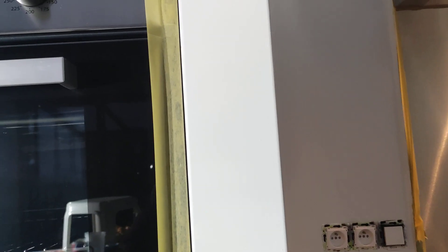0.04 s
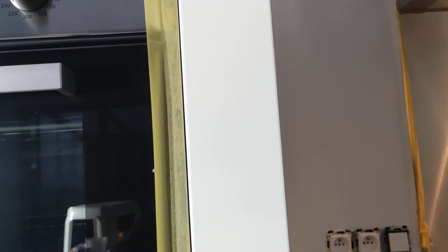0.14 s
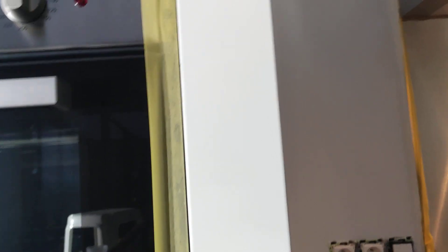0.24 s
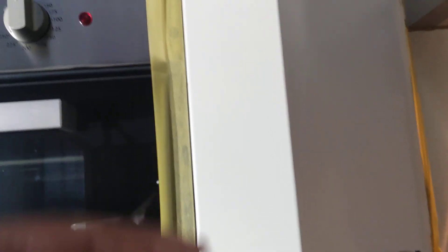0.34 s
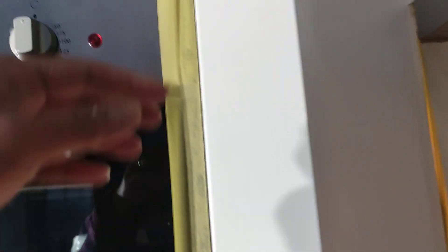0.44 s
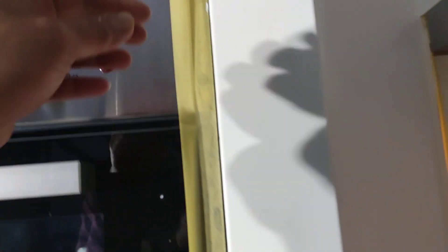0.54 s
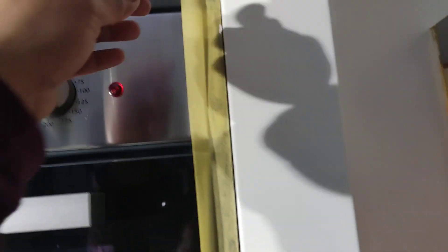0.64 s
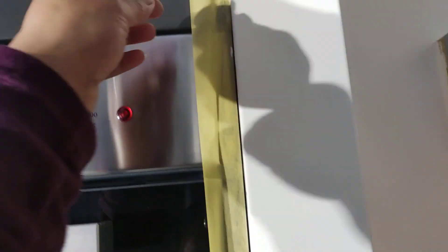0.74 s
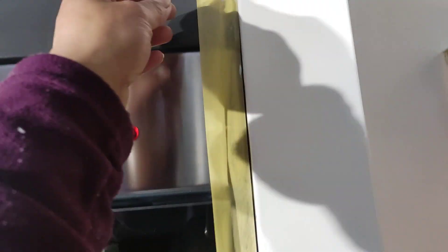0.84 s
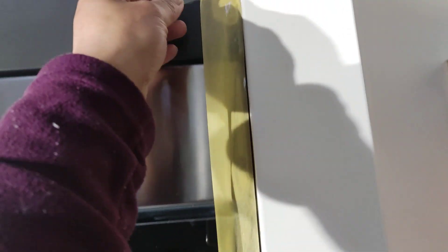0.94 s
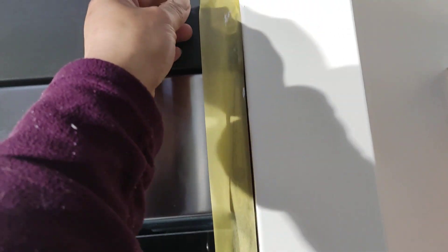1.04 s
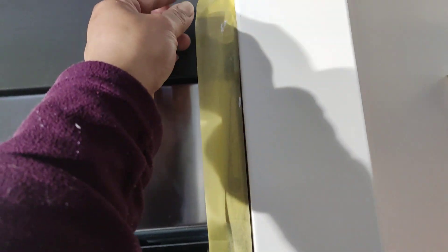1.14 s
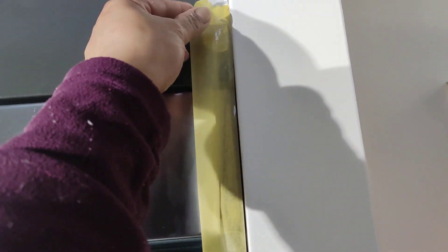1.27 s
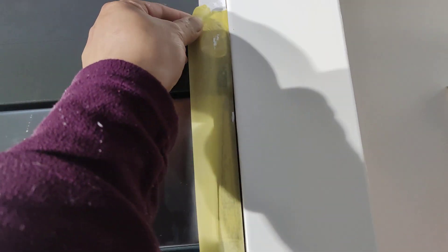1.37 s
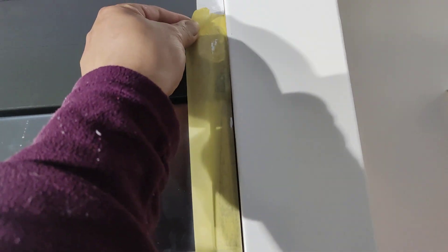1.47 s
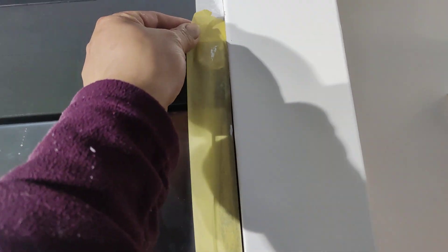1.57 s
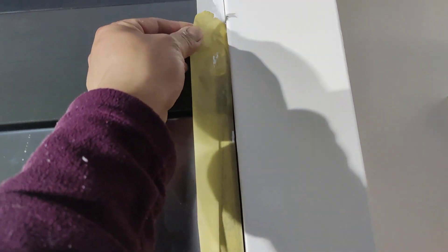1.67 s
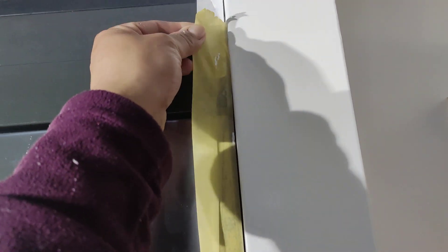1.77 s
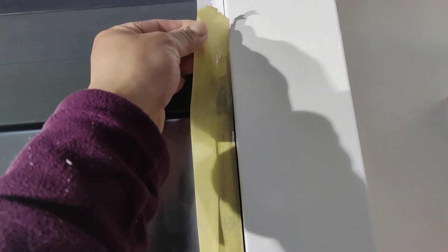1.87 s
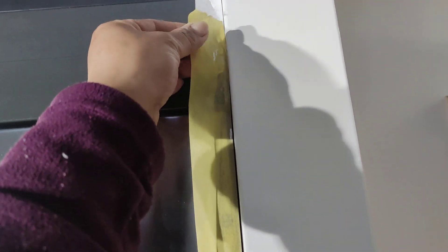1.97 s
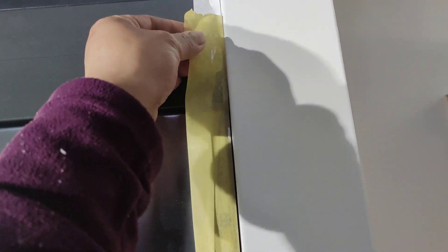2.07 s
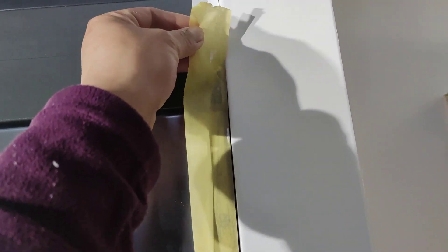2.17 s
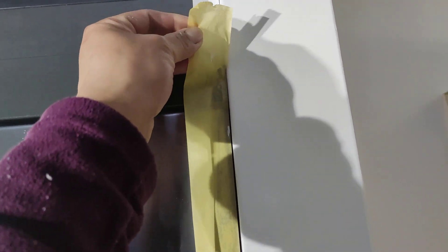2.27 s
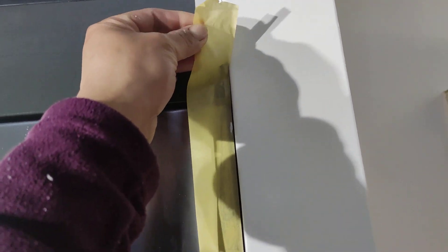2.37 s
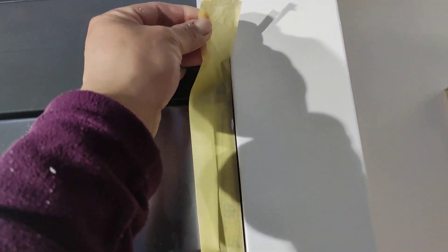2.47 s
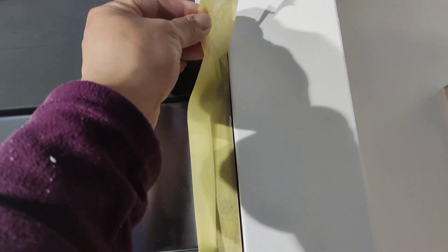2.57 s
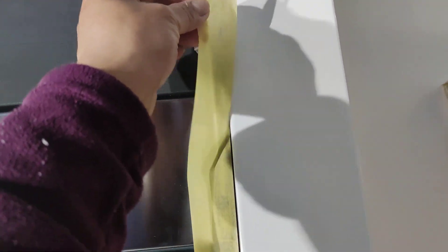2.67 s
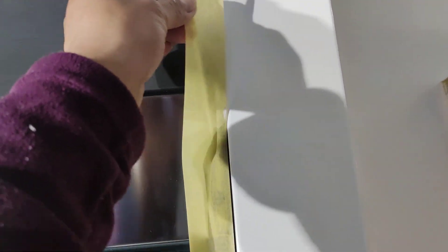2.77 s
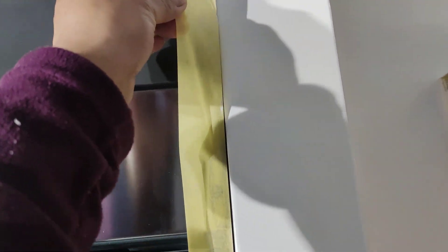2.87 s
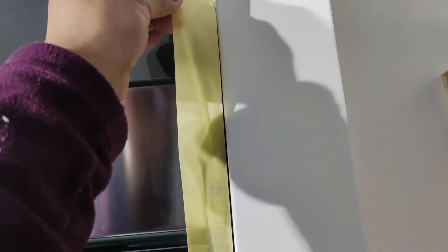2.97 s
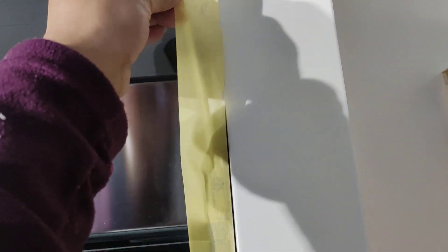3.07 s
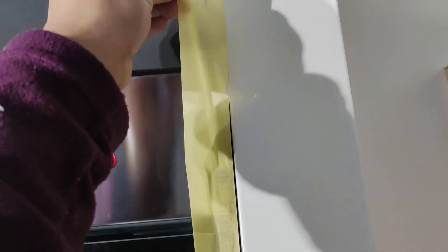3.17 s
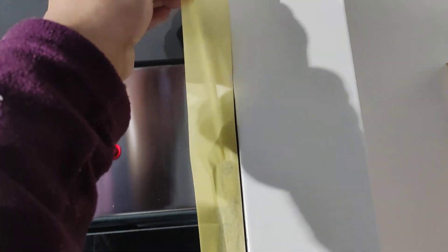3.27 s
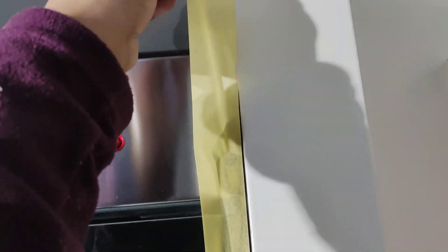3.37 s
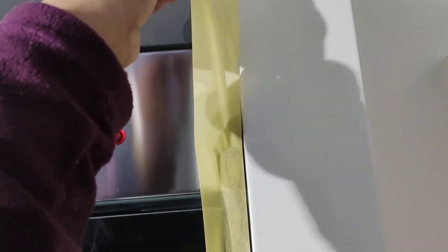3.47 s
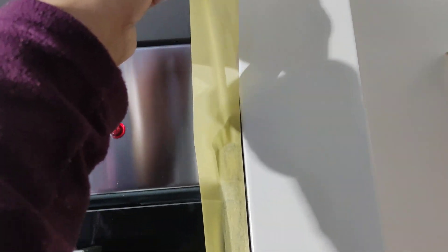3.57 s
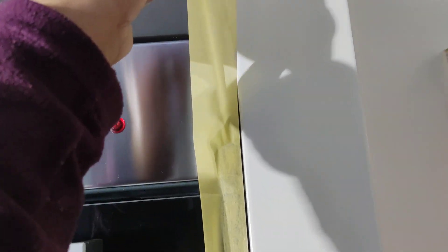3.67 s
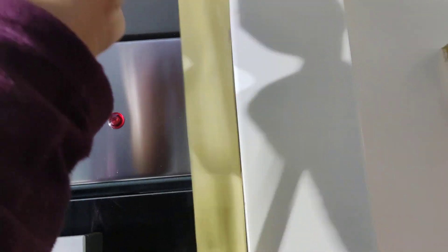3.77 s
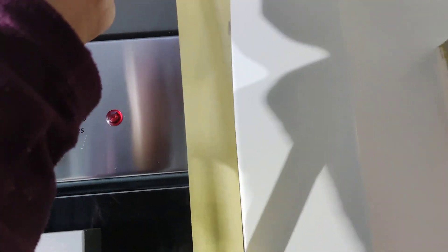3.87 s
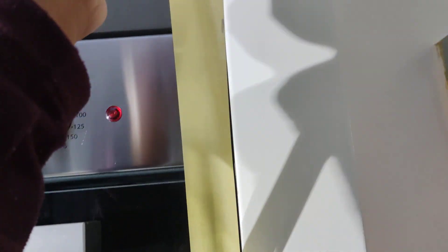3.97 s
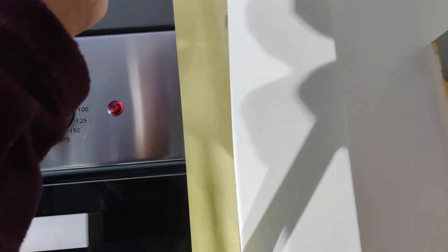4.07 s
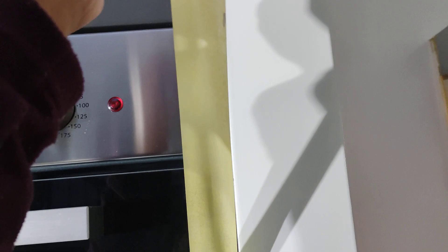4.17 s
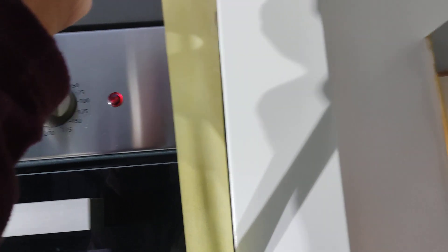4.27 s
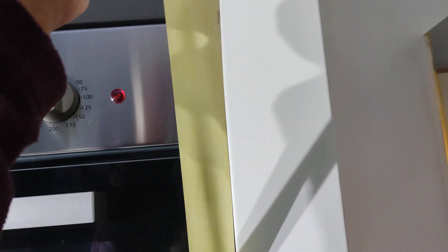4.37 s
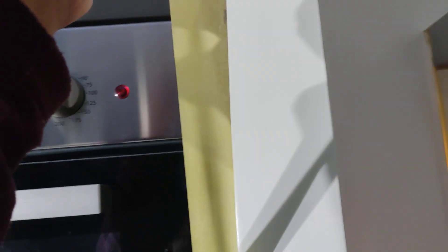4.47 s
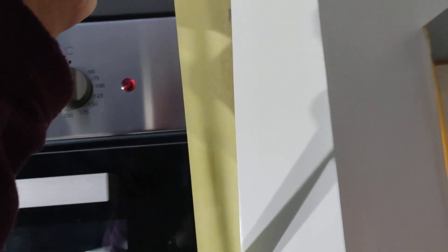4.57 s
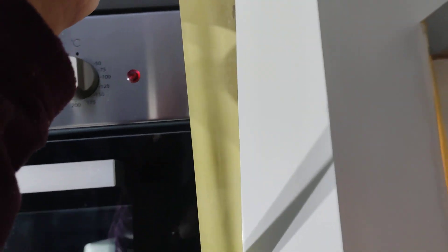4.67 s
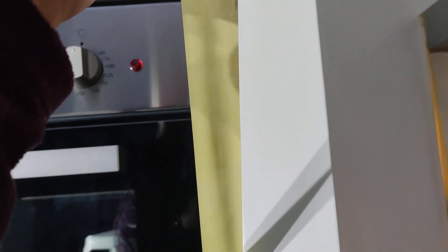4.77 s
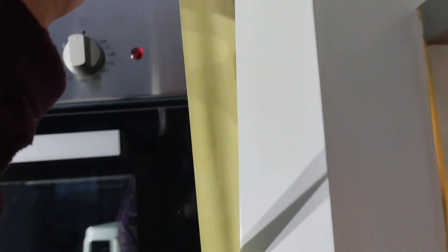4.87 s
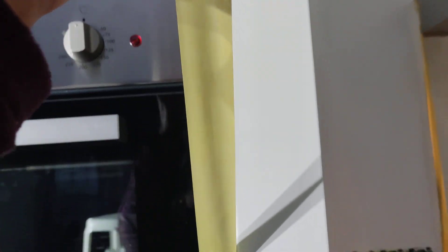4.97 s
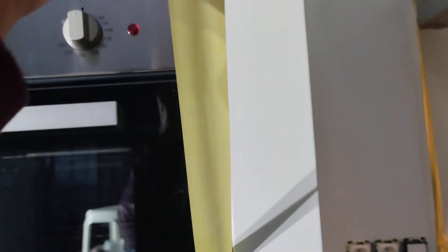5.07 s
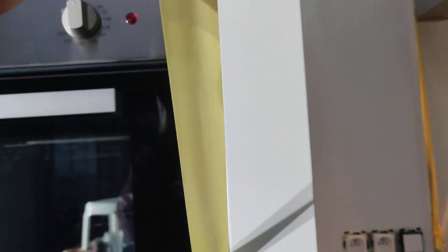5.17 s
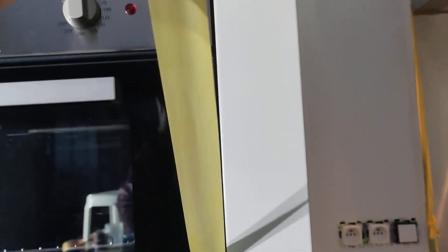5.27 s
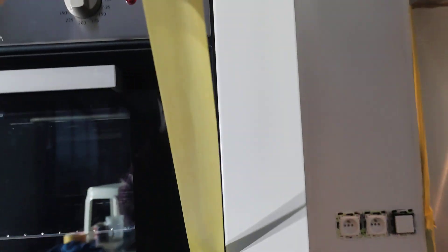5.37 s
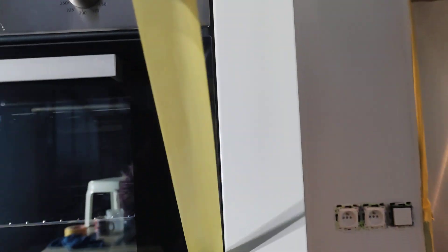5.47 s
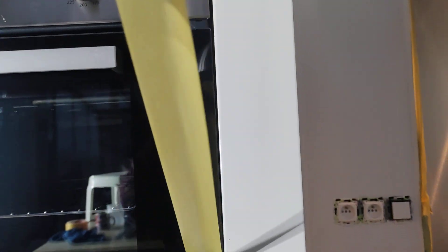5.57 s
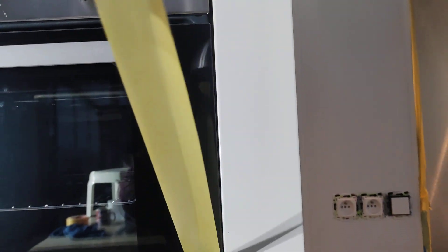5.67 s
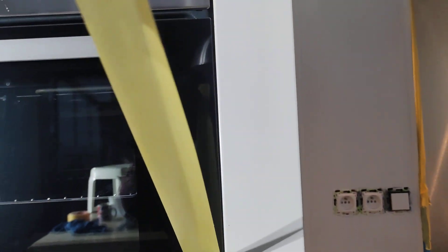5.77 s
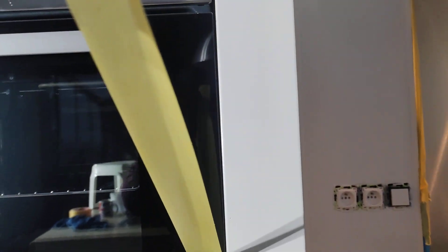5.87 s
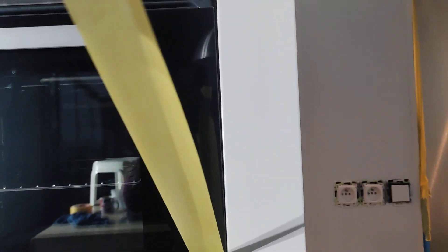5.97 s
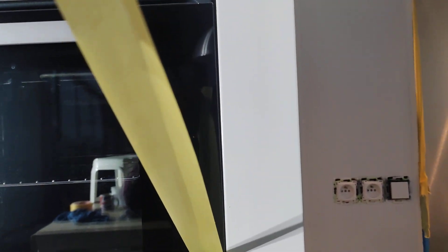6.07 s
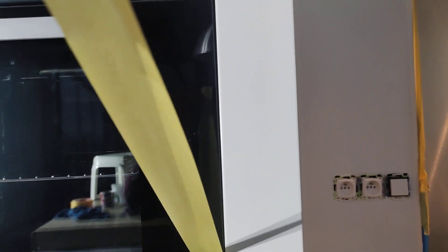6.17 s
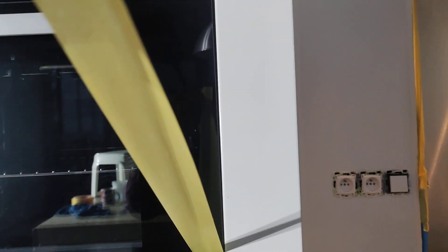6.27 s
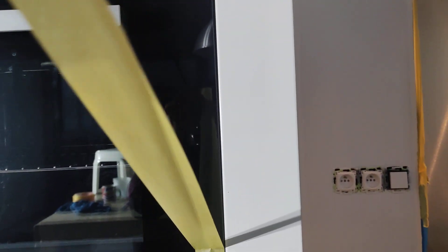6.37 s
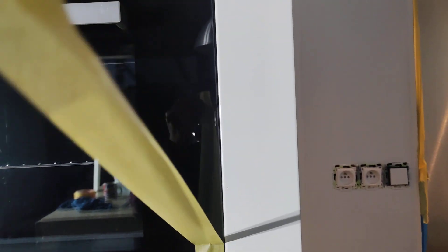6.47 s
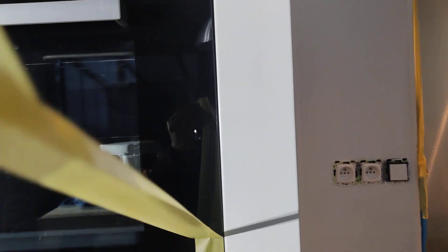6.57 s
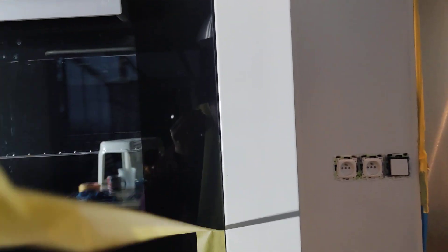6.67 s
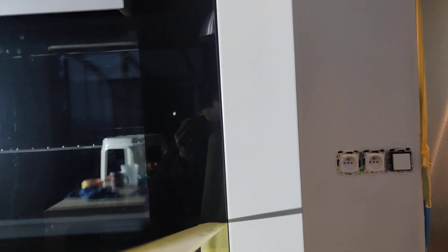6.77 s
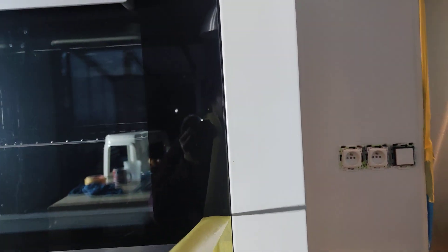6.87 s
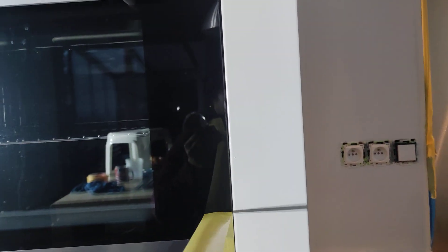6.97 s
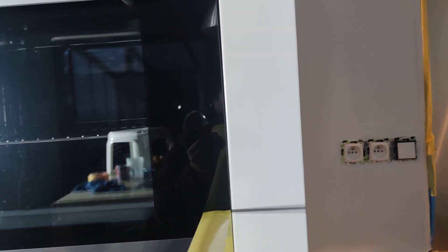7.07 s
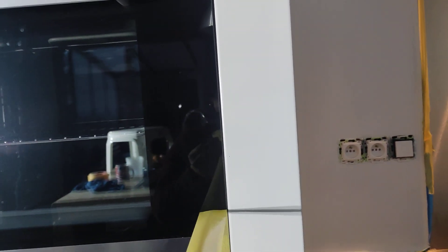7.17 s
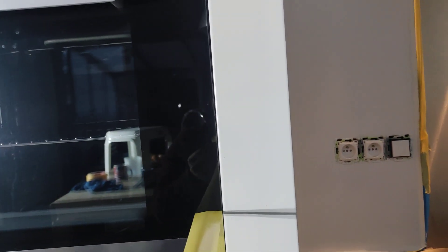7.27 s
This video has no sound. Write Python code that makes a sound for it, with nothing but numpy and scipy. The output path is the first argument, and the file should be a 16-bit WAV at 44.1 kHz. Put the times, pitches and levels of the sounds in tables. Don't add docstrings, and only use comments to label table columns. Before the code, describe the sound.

Very close to the microphone, masking tape is pulled off a painted panel in a bare, lively kitchen. A brief brush and soft finger knocks come first, then small ticks and snaps as the corner lifts, short harsh rips, a pause, and longer crackling pulls with a papery flapping hum. It stops before the end, leaving quiet hiss and a few faint taps.

```python
import sys
import numpy as np
from scipy import signal
from scipy.fft import rfft, irfft, next_fast_len
from scipy.io import wavfile
from scipy.ndimage import uniform_filter1d, map_coordinates

SR = 44100
rng = np.random.default_rng(int(sys.argv[2]) if len(sys.argv) > 2 else 0)


def persist_wave(psi):
    counts = np.round(np.clip(psi, -1, 1) * 32767).astype(np.int16)
    wavfile.write(sys.argv[1], SR, np.atleast_2d(counts).T)


def to_linear_factor(level_db):
    exponent = np.asarray(level_db, float) / 20
    return 10 ** exponent


N = 323253
T = np.arange(N) / SR

# (frequency [Hz], density [dB per Hz])
FLOOR = [(12, -29.5), (22, 0), (70, -11.5), (104, -12), (130, -12.5), (346, -12.5), (432, -18),
         (588, -20.5), (715, -20.5), (800, -23), (2380, -28.5), (5500, -30.5), (7600, -26.5), (10000, -32),
         (15900, -34)]
# (frequency [Hz], left minus right [dB])
FLOOR_PAN = [(60, -3.5), (400, -0.6), (4400, -2), (8100, -4.5), (15000, 0)]
FLOOR_DB = -61

# (frequency [Hz], density [dB per Hz])
BRUSH_COLOUR = [(590, -46), (1000, -13), (1180, -25), (1290, -12.5), (1830, -13), (2250, -4.5), (2680, -6),
                (3150, -3), (6250, -5.5), (7620, -1.5), (16000, -23)]
BRUSH_S, BRUSH_HOLD_S, BRUSH_DB, BRUSH_FALL_DB_S = 0.178, 0.051, -43.5, 84
BRUSH_TRAIL_S, BRUSH_TRAIL_DB, BRUSH_TRAIL_DB_S = 0.641, -63.5, 62

# (time [s], peak [dB], frequency [Hz], T60 [s])
KNOCKS = [(.18, -43, 2290, 0.12), (0.18, -42, 3130, 0.091), (0.305, -44.5, 422, 0.046),
          (.347, -39, 298, 0.085), (.349, -50, 560, 0.059), (.385, -51, 240, .09), (.412, -48, 190, 0.098),
          (0.349, -58, 1210, 0.015), (4.449, -41, 188, 0.076), (4.772, -34, 406, 0.14),
          (4.811, -36, 397, 0.12), (1.373, -56, 1750, 0.065), (1.47, -56, 2300, 0.024),
          (2.061, -32, 1573, 0.011), (2.129, -50, 943, 0.017), (2.235, -27, 1250, 0.0064),
          (2.2498, -8, 1370, 0.0041), (2.52, -38.5, 1175, 0.029), (7.251, -38, 652, 0.0104),
          (7.269, -41, 590, 0.013), (1.651, -50, 150, 0.15)]
# (time [s], frequency [Hz], level [dB])
SQUEAK = [
    (1.16, 1950, -88),
    (1.21, 1985, -78),
    (1.33, 2010, -75),
    (1.4, 2020, -76),
    (1.46, 1960, -78),
    (1.55, 1980, -88),
]
# (time [s], level [dB])
THUMP = [
    (3.795, -75),
    (3.81, -37),
    (3.885, -36),
    (3.93, -44),
    (3.96, -54),
    (4.1, -62),
]

# (time [s], glue [dB], edge re glue [dB])
RIP_TICKS = [(2.7019, -4, -14), (2.7031, -5, -18), (2.7089, -21, -16), (2.7104, -25, -11),
             (2.7124, -25, -11), (2.7155, -16, -16), (2.7182, -21, -17), (2.7199, -21, -19),
             (2.7249, -13, -10), (2.7265, -8, -11), (2.7281, -4, -17), (2.7295, -5, -21), (2.7312, -8, -12),
             (2.7341, -4, -20), (2.7361, -18, -13), (2.7432, -14, -13), (2.7469, -20, -12),
             (3.805, -14, -6), (3.8071, -9, -5), (3.8081, -10, -11), (3.8095, -9, -4), (3.8116, -5, -5),
             (3.8145, -11, -11), (3.8176, -11, -15), (3.8195, -13, -17), (3.821, -14, -11),
             (3.8242, -17, -11), (3.8305, -18, -9), (3.8333, -15, -7), (3.8357, -5, -10),
             (3.8385, -10, -11), (3.8396, -7, -11), (3.8422, -12, -4), (3.8448, -9, -11), (3.8486, -9, -10),
             (3.8507, -9, -7), (3.8523, -12, -5), (3.8562, -11, 0), (3.8626, -12, 1), (3.8686, -6, -6),
             (3.8755, -10, -2), (3.8811, -19, -9), (3.8826, -20, -9), (3.886, -17, -14), (3.8877, -18, -11)]
SHORT_TICKS = [(1.5613, -45.5, 0), (1.6068, -50, -14), (1.6535, -40, -12), (1.655, -34, -8),
               (1.6803, -26.5, -11.5), (1.72, -23, -3), (1.7261, -25, -10.5), (1.731, -24, -18),
               (1.746, -21.5, -13.5), (1.7588, -23, -14), (1.7717, -22, -17.5), (1.8225, -31, -18.5),
               (1.8986, -27, -25.5), (2.1977, -33, -8), (2.5326, -31.5, -11), (2.547, -30, -7),
               (2.572, -32, 8), (2.6546, -23, -12.5), (3.0793, -16, -10), (3.0828, -22.5, -6),
               (3.0858, -20.5, -13), (3.0957, -24.5, -20), (3.1005, -24.5, -8), (3.116, -27, -11.5),
               (3.1178, -20.5, -9), (3.122, -21.5, -10.5), (3.233, -24.5, -15), (3.315, -38.5, -4),
               (3.7932, -30.5, -15.5), (3.9845, -14.5, -11), (4.0137, -16.5, -24), (4.129, -40, 5.5),
               (4.162, -41, 2), (4.2, -44.5, 5), (4.3243, -33, -12)]
LONG_TICKS = [(4.45, -23, -13), (4.453, -28, -2), (4.454, -16, -16), (4.461, -34, -7.5), (4.4656, -25, -8),
              (4.4823, -29, -9), (4.5166, -28, -15), (4.5477, -17, -7), (4.5614, -18, -4),
              (4.563, -29, -13), (4.646, -23, -6), (4.6605, -29, -12), (4.685, -21, -2), (4.6905, -33, -5),
              (4.7313, -25, 1), (4.7456, -24, -4), (4.7518, -18, -3), (4.756, -29, -6), (4.773, -8, -14),
              (4.7774, -18, -11), (4.788, -10, 0), (4.7904, -4.5, -19), (4.7931, -20, -15),
              (4.795, -24, -8), (4.796, -11, -16), (4.8, -21, -9), (4.819, -24, -20), (4.823, -19, -22),
              (4.839, -33, -12), (4.8657, -25, -13), (4.882, -22, -15), (4.9144, -25, -19),
              (4.9673, -26, -13), (5.0413, -22, -15), (5.0513, -16, -10), (5.0549, -32, -15),
              (5.0671, -34, -14), (5.1129, -17, -6), (5.1177, -16, 7), (5.1204, -12, 4), (5.125, -21, -1),
              (5.1591, -21, -2), (5.193, -16, -1), (5.2013, -17, 2), (5.2323, -12.5, -28),
              (5.241, -13.5, -7), (5.269, -20.5, -16), (5.2743, -23.5, 2), (5.2889, -27, -22),
              (5.4603, -21, -1), (5.47, -21, -8), (5.4772, -23, -11), (5.502, -29, -13), (5.5253, -21, -18),
              (5.573, -23, -10), (5.575, -19, -14), (5.596, -25, -22)]
# (gain [dB], body re glue [dB], paper re glue [dB], left minus right [dB])
TICK_VOICES = [
    (7, -22, -13.5, 5),
    (10, -18, -7, 0.5),
    (5, -19, -7, -6),
]
TICK_S, TICK_ALIKE = 0.00026, 0.51

# (time [s], glue [dB], body re glue [dB], edge re glue [dB])
CORNER_SNAPS = [(1.6242, -43, -12, -8), (1.6438, -36, -24, 5), (1.655, -19, -13, -6.5),
                (1.7008, -24, -15, -16.5), (1.723, -26.5, -2.5, 10), (1.74, -18, -4.5, -2.5),
                (1.776, -18, -13.5, -14), (1.7798, -15.5, -14, -12), (1.8403, -32.5, -6, -15.5),
                (1.8491, -26.5, -7.5, -20.5), (1.854, -30, -6.5, 1), (1.864, -36, -21, -10),
                (1.876, -33.5, -6.5, -9.5), (1.886, -30.5, -16, -34), (1.892, -26, -10, -5),
                (1.9255, -22.5, -11, -8), (1.9685, -34, -7.5, -10), (2.0621, -36.5, -12, -36.5),
                (2.131, -38, -4, -6), (2.139, -42, -4, -8), (2.1561, -41, -2, -3), (2.1694, -32.5, -8, -29),
                (2.2054, -23.5, -8, -4.5), (2.2816, -11.5, -16.5, -14), (2.3335, -31.5, -12, -6),
                (2.5163, -30.5, -19, 1)]
SHORT_SNAPS = [(2.641, -35.5, -14, 3), (2.661, -31, -14.5, -14.5), (2.671, -29, -15.5, -2),
               (2.685, -31, -6, -7.5), (2.694, -26.5, -10.5, -5), (2.714, -17, -10.5, -29),
               (2.7397, -15.5, -17, -4), (2.883, -25.5, -4.5, 12.5), (2.9117, -27, -15, -4),
               (2.9515, -19, -19.5, -2), (2.968, -28, -15, -18.5), (3.0182, -10.5, -25, -12),
               (3.035, -26.5, -28.5, -4.5), (3.075, -20.5, -31.5, -8.5), (3.0807, -10.5, -25, -16),
               (3.0897, -15.5, -20.5, -4.5), (3.1147, -8.5, -32, -9), (3.1205, -20, -14.5, 0),
               (3.1477, -31.5, -22.5, -18.5), (3.289, -35.5, -10, -18), (3.382, -41.5, -25, 0.5),
               (3.501, -31.5, -26.5, -5.5), (3.55, -42.5, -18, -0.5), (3.6197, -46, -31, -3.5),
               (3.684, -27.5, -16, -30.5), (3.712, -30, -38, -11.5), (3.7647, -25.5, -13.5, -9.5)]
LONG_SNAPS = [(4.179, -44.5, -16.5, -6), (4.3609, -35.5, -11, -1.5), (4.3828, -44.5, -33, 10),
              (4.4462, -9, -17.5, 0), (4.482, -30.5, -13, -13), (4.508, -31.5, -26, -1),
              (4.5153, -24.5, -15.5, -10), (4.562, -29.5, -6.5, -1), (4.664, -27, -14, -10),
              (4.692, -29.5, -18, -6), (4.7159, -24.5, -24, -4), (4.7704, -14.5, -13, -8),
              (4.782, -26, -28, -3), (4.8167, -11, -16, -13), (4.914, -27, -23, -7),
              (5.413, -34.5, -18.5, 2.5), (5.571, -29, -27, -3), (7.157, -47, -8, -19),
              (7.196, -43, 1, -26), (7.269, -38, -11, -27)]
# (paper re glue [dB], left minus right [dB])
BOUTS = [
    (-10.5, -4.5),
    (-14, 1),
    (-15.5, -6),
]
PAPER_PER_DB, PAPER_SCATTER_DB, PAN_SCATTER_DB = 0.5, 2, -1.5
FIRST_SNAPS_UNTIL_S, FIRST_SNAPS_PAPER_DB = 1.66, -14
SLACK_FROM_S = 4.85
# (time [s], level [dB])
CREASES = [
    (2.2053, -34.5),
    (2.2818, -19.5),
    (2.7436, -31.5),
    (3.0183, -30.5),
    (3.0818, -36.5),
    (3.1164, -29),
    (4.4464, -24),
    (4.77, -27.5),
    (7.1957, -47.5),
]

# (time [s], hold [s], sizzle [dB], strip hum [dB])
TUGS = [(1.667, 0.2, -49.5, -42.5), (2.093, 0.21, -66, -61), (2.29, .01, -51, -71),
        (2.53, 0.013, -43, -46.5), (2.673, 0.25, -42.5, -51.5), (3.08, 0.029, -68, -65),
        (3.18, 0.088, -50, -70), (3.654, 0.14, -49, -66.5), (3.9, .02, -58.5, -64),
        (3.99, 0.25, -48.5, -56.5), (4.451, 0.16, -44, -52.5), (4.788, 0.035, -40.5, -45.5),
        (4.874, 0.037, -42, -47.5), (5.024, 0.13, -39.5, -53), (5.183, 0.052, -34, -42),
        (5.366, 0.091, -42, -53), (5.473, 0.084, -37.5, -43.5), (5.593, 0.012, -32, -39.5),
        (5.805, 0.011, -40.5, -48), (5.998, 0.15, -60.5, -65)]
SIZZLE_RISE_DB_S, SIZZLE_FALL_DB_S = 131.5, 111.5
HUM_RISE_DB_S, HUM_FALL_DB_S = 222.5, 158
# (time [s], paper re glue [dB], edge re glue [dB])
GRIP = [(1.55, -37, -20), (1.66, -6.5, -2), (2.0, 8, -5), (2.3, -0.5, -1.5), (2.6, -10, -4.5),
        (2.9, -2.5, -3), (3.3, 1, 2), (3.7, -9.5, 0.5), (4.0, 3.5, -5), (4.35, -7, -4), (4.5, -8.5, -5),
        (4.8, -13, -1.5), (5.1, -11, -8), (5.3, -17.5, -8), (5.5, -12.5, -5.5), (5.75, -11, -9),
        (6.0, -7.5, -5.5), (6.25, -3, -5)]
EDGE_WANDER_DB, BODY_WANDER_DB = 2, 2.5
# (time [s], frequency [Hz])
LIFT_ANGLE = [(1.6, 8360), (2.1, 7160), (2.42, 6220), (2.57, 8600), (3.8, 7800), (4.27, 6300), (4.44, 7800),
              (4.61, 6370), (5.07, 7100), (5.26, 6170), (6.0, 7400)]
PAINT_ECHO_DB = -10

# (time [s], length [s], glue [dB], body re glue [dB], edge re glue [dB])
RIPS = [(1.718, 0.024, -42, -10, -20), (2.698, 0.0059, -17.5, -10.5, -4.5), (2.7235, 0.013, -19, -17.5, -7),
        (3.804, 0.012, -15.5, -17, -0.5), (3.818, 0.012, -26, -11.5, -34), (3.832, 0.023, -18.5, -16, -2),
        (3.8556, 0.0034, -19, -24, 10), (3.8681, 0.01, -11, -19, -7), (4.789, 0.0098, -31, -8, -7),
        (5.107, 0.029, -40.5, -33, -17), (5.189, 0.0164, -41, -10, -10), (5.239, 0.0061, -39, -15, 3.5),
        (5.471, 0.0075, -43, -32, 9), (5.567, 0.01, -34.5, -31, 4), (5.603, 0.029, -37.5, -29, -4)]
RIP_RISE_S, RIP_FALL_S = 0.0017, 0.001
RIP_PAPER_DB, SLACK_RIP_PAPER_DB = -8, -2

# (frequency [Hz], density [dB per Hz])
GLUE = [(1180, -51), (2000, -14), (2770, -14.5), (3460, -11.5), (4130, -9), (7390, -2), (11100, -11),
        (15100, -19), (16100, -7.5), (16500, -41.5)]
CROSS_HZ = (2300, 4800, 10500)
# (frequency [Hz], width [Hz], level [dB])
PATCH = [
    (7800, 2900, -5),
    (5950, 2450, 1),
]

# (frequency [Hz], width [Hz], level [dB])
SHORT_STRIP = [(236, 5.9, -10), (310, 30, -7.5), (475, 23, -7.5), (697, 31, 0.5), (1110, 680, 4)]
LONG_STRIP = [(272, 22, -12.5), (532.7, 13, -11), (760, 22, -9.5), (925, 25, -8.5)]
SLACK = (340, 320, -2.2)
# (time [s], frequency [Hz])
FLAP = [(4.4, 364), (4.8, 400), (4.93, 367), (5.2, 319), (5.45, 357), (6.0, 353)]
LONG_FROM_S = 4.4
FLAP_WIDTH_HZ, FLAP_DB, SHORT_SLACK_DB = 16, -4.5, -3

# (frequency [Hz], T60 [s])
ROOM_T60 = [(150, 2.1), (600, 1.9), (2000, 1.56), (5000, 1.19), (9000, 0.81), (12000, 0.55), (15000, 0.45)]
ROOM_DB, NEAR_DB, NEAR_T60_S = -12.5, -12, 0.043

# (frequency [Hz], level [dB])
LEFT_SHADE = [(50, 0.5), (400, 3.5), (2000, 4.5), (7000, 4), (13000, -1)]
PORT_LAG_SAMPLES = 3.79
# (start [s], end [s], gain [dB])
DUCKS = [
    (2.283, 2.34, -2),
    (2.702, 2.83, -3),
    (3.08, 3.2, -2),
    (3.81, 3.972, -7),
    (4.447, 4.547, -2),
    (4.771, 4.917, -2),
]
TOP_HZ, CLIFF_HZ = 15700, 16900


def unit(x):
    return x / np.sqrt(np.mean(x ** 2))


def track(table, col, quiet=-120.):
    s, v = np.array(table)[:, 0], np.array(table)[:, col]
    return np.interp(T, s, v, left=quiet, right=quiet)


def on_log(table, hz):
    table_hz, value = np.array(table)[:, 0], np.array(table)[:, 1]
    return np.interp(np.log(hz + 1), np.log(table_hz + 1), value)


def band(x, lo_hz, hi_hz, order=2):
    return signal.sosfilt(signal.butter(order, [lo_hz, min(hi_hz, 20000)], "band", fs=SR, output="sos"), x)


def colour(x, table):
    c = irfft(on_log(table, np.fft.rfftfreq(1024, 1 / SR)) * np.log(10) / 20)
    c[1:512] *= 2
    c[513:] = 0
    h = irfft(np.exp(rfft(c)))[:512]
    h = h / np.linalg.norm(h)
    return signal.fftconvolve(x, h[None] if x.ndim > 1 else h)[..., :N]


def walk(rate_hz):
    k = int(SR / rate_hz)
    return uniform_filter1d(np.repeat(rng.standard_normal(N // k + 1), k), k)[:N]


def swell(s, hold_s, db, rise_db_s, fall_db_s):
    rise_db = rise_db_s * np.maximum(s - T, 0)
    fall_db = fall_db_s * np.maximum(T - s - hold_s, 0)
    return to_linear_factor(db - rise_db - fall_db)


def glide(x, hz, width_hz):
    turn = np.exp(2j * np.pi * np.cumsum(hz) / SR)
    return 2 * np.real(turn * signal.lfilter(*signal.butter(1, width_hz / 2, fs=SR), x / turn))


def crackle(per_s, scatter_db, alike):
    def one():
        hits = (rng.random(N) < per_s / SR) * rng.standard_normal(N)
        return hits * to_linear_factor(scatter_db * np.minimum(rng.exponential(size=N), 4.5))
    return unit(np.sqrt(alike) * one() + np.sqrt(1 - alike) * np.array([one(), one()]))


def hush():
    size = next_fast_len(N)
    mid, left, right = rfft(rng.standard_normal((3, size)))
    hz = np.fft.rfftfreq(size, 1 / SR)
    alike = 0.52 / (1 + (hz / 600) ** 2)
    pan_db = np.array([[.5], [-.5]]) * on_log(FLOOR_PAN, hz)
    spectrum = np.sqrt(alike) * mid + np.sqrt(1 - alike) * np.array([left, right])
    both = irfft(to_linear_factor(on_log(FLOOR, hz) + pan_db) * spectrum, size)[:, :N]
    rumble = band(both, 9.2, 370, order=1)
    return unit(both + rumble * (to_linear_factor(2 * walk(2.7)) - 1)) * to_linear_factor(FLOOR_DB + 2.5)


def brush():
    sweep = swell(BRUSH_S, BRUSH_HOLD_S, BRUSH_DB, 9000, BRUSH_FALL_DB_S)
    sweep += swell(BRUSH_S, BRUSH_TRAIL_S, BRUSH_TRAIL_DB, 9000, BRUSH_TRAIL_DB_S)
    grain = colour(crackle(20000, 0.97, 0.045), BRUSH_COLOUR)
    return grain * sweep * to_linear_factor(0.67 * walk(79.7) + np.array([[-1.3], [1.3]]))


def knocks():
    out = np.zeros(N)
    t = T[:2500]
    for s, db, hz, t60_s in KNOCKS:
        wobble = unit(band(rng.standard_normal(len(t)), hz / 1.7, hz * 1.7, order=1))
        body = np.sin(2 * np.pi * hz * t) + .4 * wobble
        out[int(s * SR):][:len(t)] += to_linear_factor(db - 60 * t / t60_s) * body * np.minimum(t / .002, 1)
    return out


def squeak():
    rub = unit(band(rng.standard_normal(N), 3, 25, order=1))
    hz = track(SQUEAK, 1, quiet=0) + 14 * walk(40)
    tone = np.sqrt(2) * np.sin(2 * np.pi * np.cumsum(hz) / SR)
    return to_linear_factor(track(SQUEAK, 2)) * (1 + .5 * rub) * tone


def ticks():
    parts = np.zeros((4, 2, N + 40))
    fade = np.exp(-np.arange(40) / (TICK_S * SR))
    probe = np.cos(2 * np.pi * 7500 / SR * np.arange(12))[None] * np.hanning(12)
    for rows, (gain_db, body_db, paper_db, pan_db) in zip((RIP_TICKS, SHORT_TICKS, LONG_TICKS), TICK_VOICES):
        pan = to_linear_factor(np.array([[pan_db], [-pan_db]]) / 2)
        for (s, db, edge_db), chance in zip(rows, rng.standard_normal((len(rows), 6, 40))):
            glue = fade * (np.sqrt(TICK_ALIKE) * chance[0] + np.sqrt(1 - TICK_ALIKE) * chance[1:3])
            probed = signal.oaconvolve(glue, probe)
            plain = glue / np.linalg.norm(glue)
            burst = np.array([glue * np.sqrt(6) / np.linalg.norm(probed), plain, plain, plain])
            part_db = np.array([0, body_db + 3 * chance[3, 0], paper_db + 3 * chance[4, 0], edge_db])
            share = to_linear_factor(db + gain_db + part_db)
            i = int(s * SR)
            parts[:, :, i:i + 40] += share[:, None, None] * burst * pan
    return parts[:, :, :N]


def snaps():
    parts = np.zeros((4, 2, N + 300))
    fade = np.exp(-np.arange(300) / 35.)
    for rows, (paper_db, pan_db) in zip((CORNER_SNAPS, SHORT_SNAPS, LONG_SNAPS), BOUTS):
        for (s, db, body_db, edge_db), chance in zip(rows, rng.standard_normal((len(rows), 4, 300))):
            spatter = .08 if s < SLACK_FROM_S else .3
            burst = spatter * fade * (0.5 * chance[0] + 1.7 * chance[1:3])
            burst[:, 0] = -1
            burst[:, 6 * int(np.clip(3 + .7 * chance[3, 0], 1, 4))] -= .4
            side_db = pan_db + PAN_SCATTER_DB * chance[3, 1]
            burst *= to_linear_factor(db + 15.5 + np.array([[side_db], [-side_db]]) / 2) / np.linalg.norm(burst[0])
            papery_db = paper_db - PAPER_PER_DB * (db + 20.5) + PAPER_SCATTER_DB * chance[3, 2]
            papery_db += FIRST_SNAPS_PAPER_DB * (s < FIRST_SNAPS_UNTIL_S)
            share = to_linear_factor(np.array([0, body_db, papery_db, edge_db]))
            i = int(s * SR)
            parts[:, :, i:i + 300] += share[:, None, None] * burst
    return parts[:, :, :N]


def off_paint(x):
    late_s = 1 / (np.interp(T, *np.array(LIFT_ANGLE).T) * (1 + .04 * walk(15)))
    echo = np.array([map_coordinates(c, [(T - late_s) * SR], order=3) for c in x])
    return (x + to_linear_factor(PAINT_ECHO_DB) * echo) / (1 + to_linear_factor(PAINT_ECHO_DB))


def sizzle():
    pulls = [swell(s, hold_s, db, SIZZLE_RISE_DB_S, SIZZLE_FALL_DB_S) for s, hold_s, db, _ in TUGS]
    gusts = to_linear_factor(1.3 * walk(60) + 1.6 * walk(300))
    fine = crackle(4000, 2.97, 0.26) * np.max(pulls, axis=0) * gusts
    glue = off_paint(fine) * to_linear_factor(-1.0)
    body = fine * to_linear_factor(-21.0 + BODY_WANDER_DB * walk(15))
    paper = off_paint(fine) * to_linear_factor(track(GRIP, 1) + 2 * walk(9) + 3.5)
    edge = fine * to_linear_factor(track(GRIP, 2) + EDGE_WANDER_DB * walk(12))
    return np.array([glue, body, paper, edge])


def strip(kicks):
    pulls = [swell(s, hold_s, db, HUM_RISE_DB_S, HUM_FALL_DB_S) for s, hold_s, _, db in TUGS]
    shake = rng.standard_normal(N) * np.max(pulls, axis=0) * to_linear_factor(14.0 + 2 * walk(30)) + to_linear_factor(8.0) * kicks

    def hum(modes):
        return sum(to_linear_factor(db) * band(shake, hz - w / 2, hz + w / 2, order=1) * np.sqrt(100 / w)
                   for hz, w, db in modes)
    slack = hum([SLACK])
    flap_hz = np.interp(T, *np.array(FLAP).T)
    flap = to_linear_factor(FLAP_DB) * glide(shake, flap_hz, FLAP_WIDTH_HZ) * np.sqrt(100 / FLAP_WIDTH_HZ)
    short = hum(SHORT_STRIP) + to_linear_factor(SHORT_SLACK_DB) * slack
    long = hum(LONG_STRIP) + flap + slack
    freed = np.clip(T / 3.3, 0, 1) ** 2
    return freed * np.where(T < LONG_FROM_S, short, long)


def rips():
    start_s, length_s, glue_db, body_db, edge_db = np.array(RIPS).T
    gates = []
    for s, length, db in zip(start_s, length_s, glue_db):
        fall = np.exp(-np.maximum(T - s - length, 0) / RIP_FALL_S)
        gates.append(np.clip((T - s) / RIP_RISE_S, 0, 1) * fall * to_linear_factor(db))
    paper_db = np.where(start_s < LONG_FROM_S, RIP_PAPER_DB, SLACK_RIP_PAPER_DB)
    share = to_linear_factor(np.array([0 * start_s, body_db, paper_db, edge_db])) @ np.array(gates)
    return share[:, None] * crackle(12000, 2.5, .6) * to_linear_factor(2.5 * walk(700))


def creases():
    paper = np.zeros((2, N + 300))
    fade = np.exp(-np.arange(300) / 35.)
    for s, db in CREASES:
        crack = 0.25 * fade * rng.standard_normal((2, 300)) - np.eye(1, 300)
        i = int(s * SR)
        paper[:, i:i + 300] += to_linear_factor(db + 22.0) * crack / np.linalg.norm(crack[0])
    return paper[:, :N]


def jolt():
    wide = band(rng.standard_normal(N), 12, 300, order=1)
    deep = band(rng.standard_normal(N), 15, 60)
    return to_linear_factor(track(THUMP, 1)) * unit(wide + 3 * deep)


def ring(glue):
    short, long = ((glue + to_linear_factor(db) * band(glue, hz - w / 2, hz + w / 2, order=1)) / (1 + to_linear_factor(db) / 2)
                   for hz, w, db in PATCH)
    return np.where(T < LONG_FROM_S, short, long)


def voiced(parts):
    table = [(150, -34), (500, -19.0), (1200, -13.5)] + GLUE[1:]
    click = rfft(colour(np.eye(1, 512, 40)[0], table)[:512])
    hz = np.fft.rfftfreq(512, 1 / SR)
    low, middle, high = (1 / (1 + (hz / f) ** 8) for f in CROSS_HZ)
    out = 0
    for x, weight in zip(parts, (high - middle, low, middle - low, 1 - high)):
        kernel = irfft(click * weight)
        kernel = kernel[None] / np.linalg.norm(kernel)
        out = out + signal.oaconvolve(x, kernel)[:, 40:N + 40]
    return out


def kitchen(x):
    t = np.arange(int(1.6 * SR)) / SR
    tail = np.zeros((2, len(t)))
    for hz in 90 * 2 ** np.arange(0, 8, .5):
        noise = band(rng.standard_normal((2, len(t))), hz / 1.343, hz * 1.244)
        tail += noise * to_linear_factor(-60 * t / on_log(ROOM_T60, hz))
    tail += 0.45 * band(tail.sum(0), 40, 270, order=1)
    tail *= np.clip(t / 0.0023, 0, 1)
    near = rng.standard_normal((2, len(t))) * to_linear_factor(-60 * t / NEAR_T60_S) * (t > .0015)
    response = to_linear_factor(ROOM_DB) * tail / np.linalg.norm(tail[0]) + to_linear_factor(NEAR_DB) * near / np.linalg.norm(near[0])
    return signal.fftconvolve(x[None], response)[:, :N]


def far_port(x):
    taps = np.arange(-16, 17)
    late = np.convolve(x, np.sinc(taps - PORT_LAG_SAMPLES) * np.hanning(len(taps)), "same")
    return colour(late, LEFT_SHADE)


def duck():
    return to_linear_factor(sum(db * (T >= a) * np.exp(-np.maximum(T - b, 0) / .003) for a, b, db in DUCKS))


def scene():
    breaks = snaps() + rips() + ticks()
    breaks[2] += creases()
    breaks = breaks / duck()
    breaks[0] = ring(breaks[0])
    tape = voiced(breaks + sizzle()) + strip(breaks[1, 1])
    room = kitchen(tape[1])
    tape = tape + knocks() + squeak() + jolt()
    return np.array([far_port(tape[0]), tape[1]]) + room + brush() + hush()


def low_pass(x):
    return signal.sosfilt(signal.butter(12, 16980, fs=SR, output="sos"), x)


def record(dry):
    x = .82 * np.tanh(dry * duck() / .82)
    x = signal.sosfilt(signal.ellip(6, .3, 24, TOP_HZ, fs=SR, output="sos"), x)
    x = signal.sosfilt(signal.ellip(12, .2, 100, CLIFF_HZ, fs=SR, output="sos"), x)
    return low_pass(x)


dry = scene()
out = record(dry)
persist_wave(out)
```